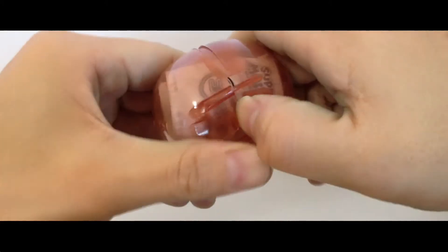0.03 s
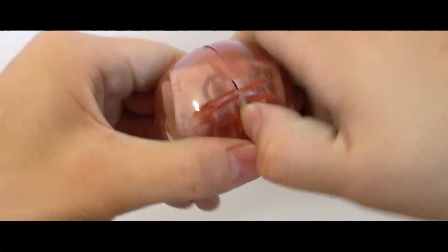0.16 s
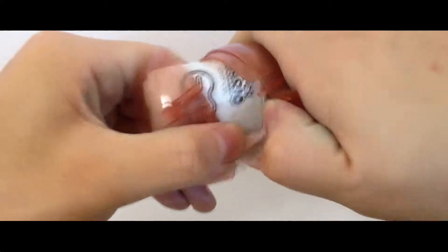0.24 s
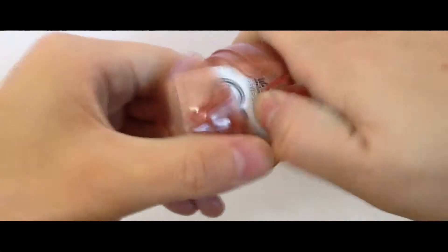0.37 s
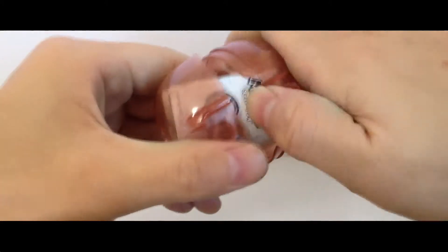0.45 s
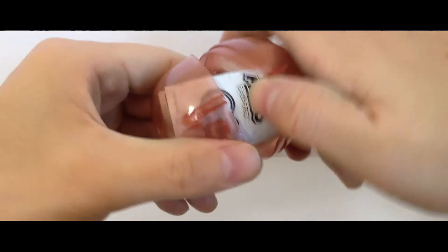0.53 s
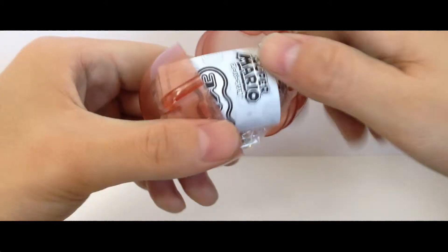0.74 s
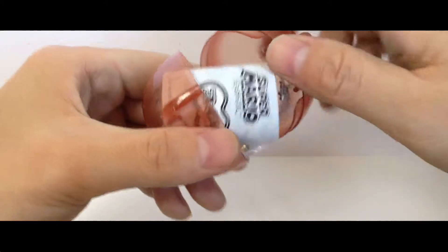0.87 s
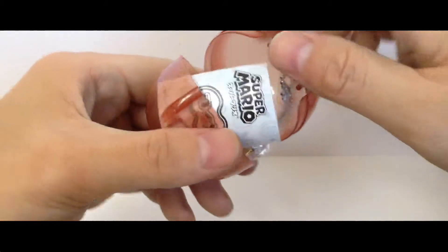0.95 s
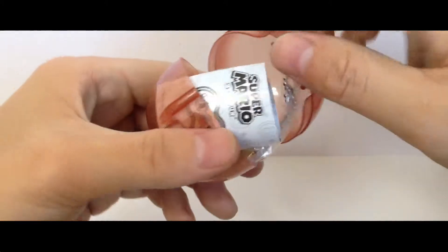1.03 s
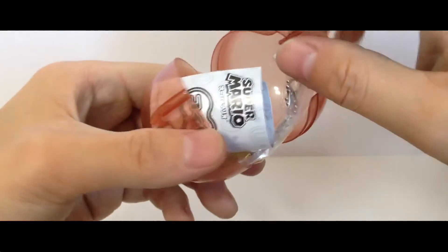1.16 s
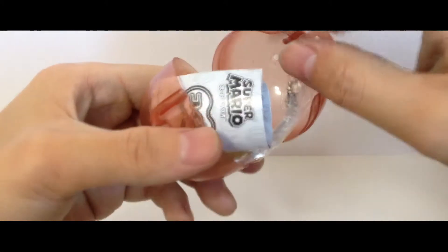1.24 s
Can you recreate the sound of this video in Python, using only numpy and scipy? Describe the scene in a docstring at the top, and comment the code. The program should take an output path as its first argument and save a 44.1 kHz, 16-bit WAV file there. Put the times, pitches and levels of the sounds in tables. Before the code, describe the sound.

A small plastic capsule snaps open with one sharp, hollow pop, close to the microphone in a quiet room. The halves then tick faintly as they part, while fingers softly rub and shift on the shell.

```python
"""A quiet room, the microphone close to a small plastic capsule squeezed between the fingers over a table.
The rim creaks, then jumps its catch in a few quick slips and the freed shell rings: one sharp, hollow
pop, thrown back by the table top and dying away in the room. The halves tick faintly as they are
parted, and the fingers rub and shift on the shell over a faint, steady hiss."""
import sys
import numpy as np
from scipy import signal
from scipy.io import wavfile

SR = 44100
rng = np.random.default_rng(int(sys.argv[2]) if len(sys.argv) > 2 else 0)


def output_pcm(signal):
    """Save a mono or channel-first signal as 16-bit PCM at the path in sys.argv[1].

    Samples are clipped to [-1, 1] before scaling.
    """
    pcm = np.clip(np.atleast_2d(signal).T, -1, 1) * 32767
    wavfile.write(sys.argv[1], SR, np.round(pcm).astype(np.int16))


N = 57330
T = np.arange(N) / SR

# The rim jumping its catch. Each row: start in seconds, level in dB, centre in Hz, band edge ratio,
# t60 in seconds.
RIM_SLIPS = [(0.2038, -21, 1389, 1.1, 0.025), (0.2055, -6, 9027, 1.75, 0.0056),
             (0.2049, -10, 2794, 3.2, 0.014), (0.2071, -6.5, 5264, 1.9, 0.0095),
             (0.209, -19.5, 6500, 1.2, 0.02)]
# The ring of the shell. Each row: frequency in Hz, level in dB, t60 in seconds.
SHELL_MODES = [(168, -32, 0.016), (355, -29, .026), (703, -21, 0.034), (965, -17.5, .015),
               (1019, -14.5, 0.024), (1442, -11, 0.02), (1495, -11.5, 0.021), (1993, -20, 0.037),
               (2001, -11.5, .015), (2224, -11, 0.011), (2700, -18.5, 0.014), (3070, -15, .011),
               (4825, -20, 0.02), (6710, -27, .014), (7640, -21.5, 0.011), (8200, -22, 0.031)]
# Light knocks of the halves. Each row: start in seconds, note level in dB, note pitch in Hz,
# note t60 in seconds, tick level in dB, tick centre in Hz, tick band edge ratio.
KNOCKS = [(0.09, -47.5, 935, 0.012, -55.5, 3070, 3.1), (0.166, -42.5, 787.3, 0.017, -56, 2950, 1.6),
          (0.358, -37, 775, 0.0083, -42, 3940, 7.5), (0.364, -42, 437, 0.026, -43, 1500, 1.9),
          (0.4052, -56.5, 1540, 0.043, -45, 8450, 2.2), (0.4798, -44.5, 1415, 0.025, -52, 4486, 1.37),
          (0.638, -59, 1560, 0.03, -54, 4182, 1.5), (0.654, -53, 1517, 0.022, -67, 5050, 1.97),
          (0.666, -37, 1489, 0.016, -41, 4280, 1.2), (1.2293, -41, 1900, 0.013, -46.5, 2260, 1.19)]
# Skin and plastic sliding. Each row: peak time in seconds, length in seconds, level in dB,
# centre in Hz, band edge ratio.
SLIDES = [(0.1, 0.032, -69.5, 3250, 1.42), (0.119, .07, -63.5, 850, 1.145), (0.194, 0.018, -49.5, 920, 1.5),
          (0.56, 0.089, -76, 1520, 1.048), (1.278, .05, -74.5, 1910, 0.99), (0.226, 0.067, -48, 3565, 2.5),
          (0.322, 0.022, -47.5, 4100, 2.4), (0.359, 0.0073, -46, 744, 1.284),
          (0.359, 0.016, -59, 4910, 2.5), (0.365, 0.016, -52, 200, 1.3), (0.412, 0.034, -64.5, 890, 3.5),
          (0.67, 0.039, -64.5, 3454, 1.62), (0.683, 0.0512, -62, 404, 1.26),
          (0.885, 0.036, -70, 4606, 1.22), (0.943, .012, -67, 2178, 1.44), (1.162, 0.013, -66, 1563, 1.56),
          (1.116, 0.039, -73, 8180, 1.04)]
# The hands shifting. Each row: time in seconds, rumble level in dB, rustle level in dB.
GRIP_LEVELS = [(0, -62.5, -75.5), (.15, -64, -71.5), (.3, -56, -52.5), (.41, -65, -75.5), (.5, -67, -77),
               (.63, -68.5, -72), (.69, -59, -74.5), (.78, -57, -72), (0.921, -60.5, -70.5),
               (.98, -65, -78.5), (1.1, -63, -73.5), (1.3, -70, -74.5)]
# Notes of the rubbed shell. Each row: centre in Hz, band edge ratio, level in dB against the rustle.
RUBBED_NOTES = [(1554, 0.93, -7.5), (1884, 1.06, -4), (4400, 1.1, -10)]
# Spectra of the hands, the room's tail and the hiss. Each row: frequency in Hz, relative density in dB.
RUMBLE_SPECTRUM = [(30, -14), (70, -8.5), (120, 2.5), (170, 3.5), (250, -2.5), (400, -13.5), (600, -20),
                   (1200, -38.5), (16000, -81.5)]
RUSTLE_SPECTRUM = [(30, -25.5), (500, -5), (1000, 0), (1500, -3.5), (2000, -3.5), (2900, -4), (4500, -7),
                   (7000, -8.5), (10000, -16.5), (16000, -23.5)]
ROOM_SPECTRUM = [(30, -14), (150, 17), (350, 14.5), (600, 3), (1000, 6), (1500, 4), (2200, 3.5),
                 (3000, -1.5), (4000, 2), (5500, -2), (7500, 5.5), (10000, -2.5), (13000, -0.5),
                 (16000, 5.5)]
HISS_SPECTRUM = [(30, 11), (150, 9), (500, 7), (2000, 1.5), (6000, 0), (10000, -5), (16000, 0)]
# How long the room rings. Each row: frequency in Hz, t60 in seconds.
ROOM_DECAY = [(150, 0.2), (500, 0.36), (1400, 0.38), (3700, 0.29), (8000, 0.33), (15000, 0.16)]


def rim_cracks():
    """Each slip of the rim over the catch is a burst of noise a few milliseconds long."""
    bursts = sum(from_db(db) * noise_band(hz, ratio) * decay(start, t60)
                 for start, db, hz, ratio, t60 in RIM_SLIPS)
    return butter(bursts, [754, 15280], "band", order=4)


def shell_ring(start_s=0.2049, swell_s=0.003):
    """The shell's modes swell as the halves spring apart, and the fingers damp them at once."""
    age = T - start_s
    swell = np.sin(np.pi / 2 * np.clip(age / swell_s, 0, 1)) ** 2
    fall_s = np.maximum(age - swell_s, 0)
    return swell * sum(from_db(db - 60 * fall_s / t60) * np.sin(2 * np.pi * hz * age)
                       for hz, db, t60 in SHELL_MODES)


def knocks():
    """The halves touch: a tick and one hollow note, whose pitch depends on how they are held."""
    out = 0
    for start, note_db, hz, t60, tick_db, tick_hz, ratio in KNOCKS:
        note = decay(start, t60) * np.sin(2 * np.pi * hz * (T - start))
        note = butter(note, [hz / np.sqrt(2), hz * np.sqrt(2)], "band", order=1)
        tick = noise_band(tick_hz, ratio) * decay(start, t60=0.0088)
        tick = butter(tick, [tick_hz / 2, tick_hz * 2], "band")
        out += from_db(note_db) * note + from_db(tick_db) * tick
    return out


def rubs():
    """Short slides of skin and plastic that swell and fade."""
    return friction(rough_db=-0.5) * sum(
        from_db(db) * noise_band(hz, ratio) * np.exp(-(2 * (T - peak) / length) ** 2)
        for peak, length, db, hz, ratio in SLIDES)


def friction(rough_db):
    """Skin grips plastic unevenly: a fast random gain."""
    flutter = rms_one(butter(rng.standard_normal(N), 83, "low"))
    return from_db(rough_db * flutter)


def hands():
    """The shifting grip gives a dull rumble and a light rustle that stirs the shell's notes."""
    times, rumble_db, rustle_db = np.transpose(GRIP_LEVELS)
    rumble = from_db(np.interp(T, times, rumble_db)) * shaped_noise(RUMBLE_SPECTRUM)
    rustle = from_db(-1) * shaped_noise(RUSTLE_SPECTRUM)
    notes = sum(from_db(db) * noise_band(hz, ratio) for hz, ratio, db in RUBBED_NOTES)
    rustle_gain = from_db(np.interp(T, times, rustle_db)) * friction(rough_db=1.0)
    return rumble + rustle_gain * (rustle + notes)


def table_echo(sound, delay_s=0.0072):
    """One dull reflection off the table top reaches the microphone just after the direct sound."""
    delayed = np.interp(T - delay_s, T, sound)
    return from_db(-14) * butter(delayed, 4280, "low", order=1)


def room_tail(sound, delay_s=0.005, build_s=0.012):
    """A diffuse tail builds up once the sound has reached the nearest walls."""
    build = np.clip((T - delay_s) / build_s, 0, 1)
    tail = shaped_noise(ROOM_SPECTRUM, ROOM_DECAY) * build
    response = rms_one(tail) / np.sqrt(N)  # unit energy
    return from_db(-14) * signal.fftconvolve(sound, response)[:N]


def hiss():
    """A faint, steady noise floor behind everything."""
    return from_db(-73.5) * shaped_noise(HISS_SPECTRUM)


def from_db(db):
    """Decibels to gain."""
    return 10 ** (np.asarray(db) / 20)


def rms_one(x):
    """Scale to unit power."""
    return x / np.sqrt(np.mean(x ** 2) + 1e-20)


def at_hz(table, hz):
    """Read a table on a log-frequency axis."""
    frequencies, values = np.transpose(table)
    return np.interp(np.log(hz), np.log(frequencies), values)


def butter(x, hz, kind, order=2):
    """Causal Butterworth filter."""
    edges = np.clip(hz, 10, .47 * SR)
    return signal.sosfilt(signal.butter(order, edges, kind, fs=SR, output="sos"), x + 1e-18)


def decay(start, t60):
    """A sudden start, then a fall of 60 dB every t60 seconds."""
    return (T >= start) * from_db(-60 * np.maximum(T - start, 0) / t60)


def noise_band(hz, ratio):
    """Unit noise from hz / ratio to hz * ratio, the ratio held to at least 1.03."""
    ratio = max(ratio, 1.03)
    return rms_one(butter(rng.standard_normal(N), [hz / ratio, hz * ratio], "band"))


def shaped_noise(spectrum, t60s=None):
    """Unit noise from bands 0.4 octave wide; with t60s each band dies at its own rate."""
    edges = 30 * 2 ** (np.arange(24) * .4)
    white, out = rng.standard_normal((2, N)), 0
    for k, (low, high) in enumerate(zip(edges, edges[1:])):
        hz = np.sqrt(low * high)
        band = butter(white[k % 2], [low, high], "band") * from_db(at_hz(spectrum, hz))
        out += band if t60s is None else band * decay(0, at_hz(t60s, hz))
    return rms_one(out)


def scene():
    """In mono: the capsule and hands up close, then the table's echo, the room and the hiss."""
    contacts = rim_cracks() + knocks() + rubs()
    hollow = shell_ring()
    capsule = contacts + hollow
    reflections = table_echo(capsule) + room_tail(contacts + from_db(-11) * hollow)
    return (capsule + reflections + hands() + hiss())[None]


def record(dry, ceiling=0.95, low_cut_hz=100, high_cut_hz=15700):
    """The microphone chain rounds off peaks near its ceiling, then cuts the deep bass and the very top."""
    limited = dry / (1 + (dry / ceiling) ** 8) ** (1 / 8)
    high_cut = signal.ellip(10, .1, 80, high_cut_hz, fs=SR, output="sos")
    return signal.sosfilt(high_cut, butter(limited, low_cut_hz, "high"))


dry = scene()
out = record(dry)
output_pcm(out)
```